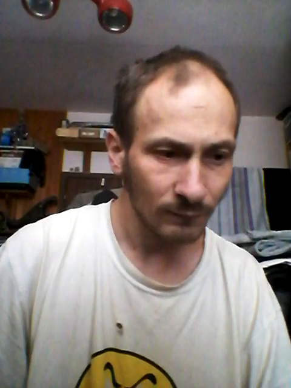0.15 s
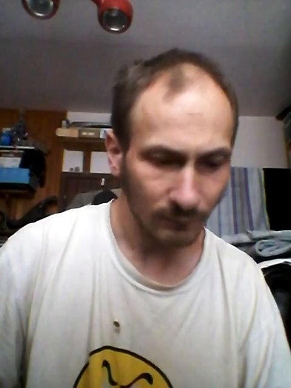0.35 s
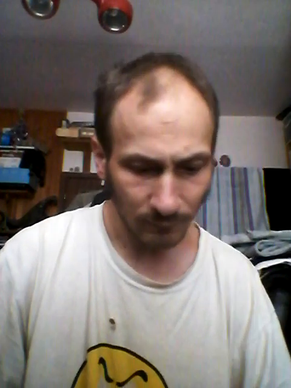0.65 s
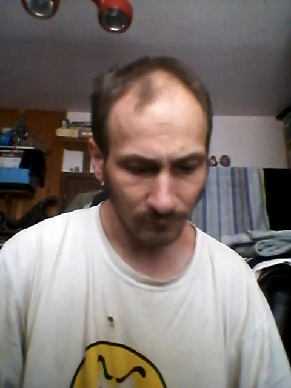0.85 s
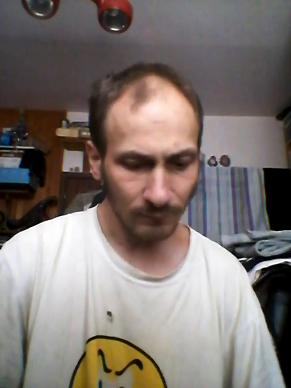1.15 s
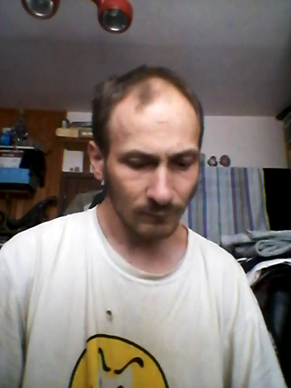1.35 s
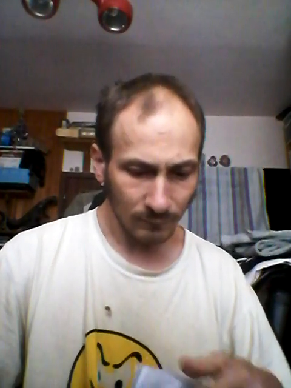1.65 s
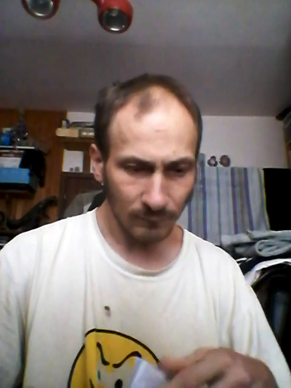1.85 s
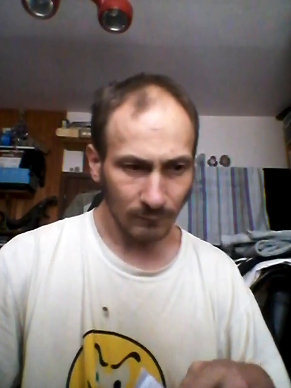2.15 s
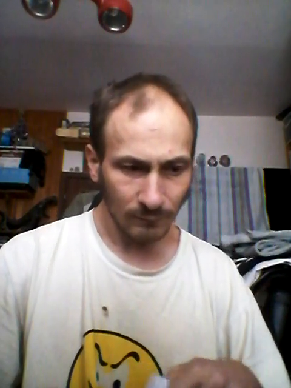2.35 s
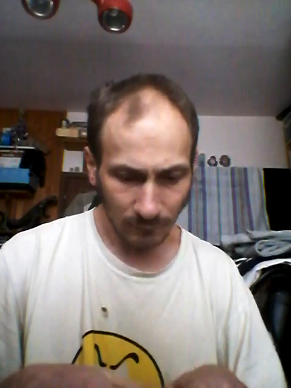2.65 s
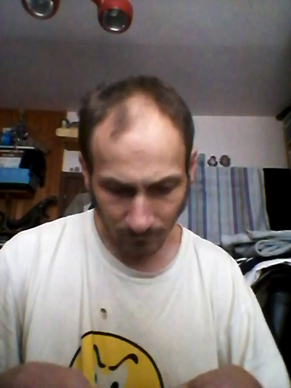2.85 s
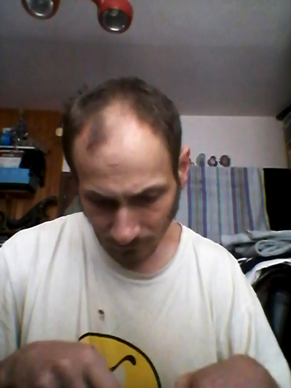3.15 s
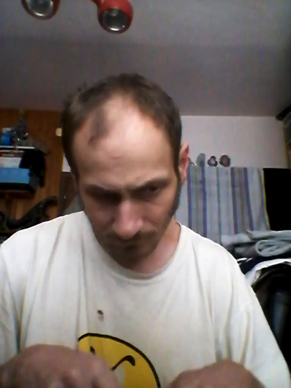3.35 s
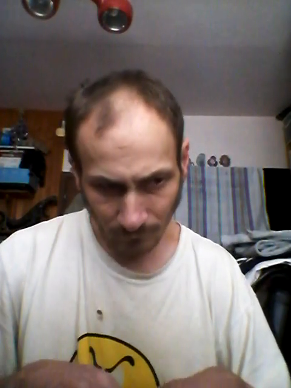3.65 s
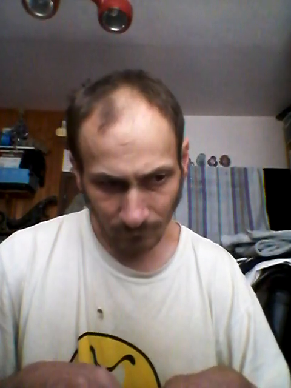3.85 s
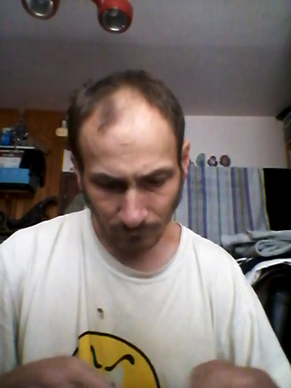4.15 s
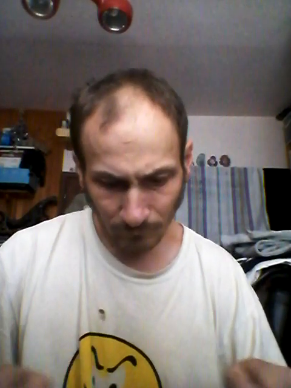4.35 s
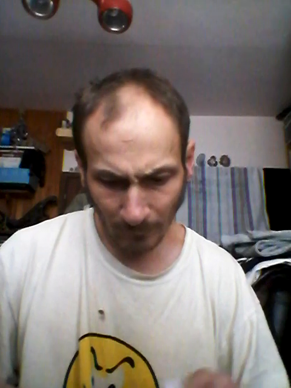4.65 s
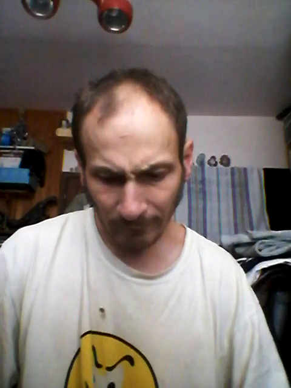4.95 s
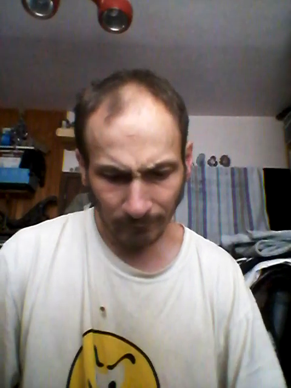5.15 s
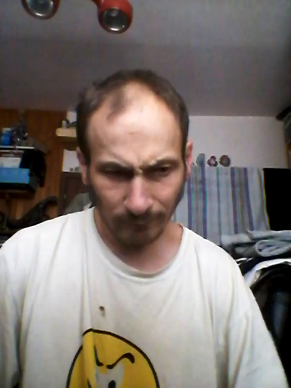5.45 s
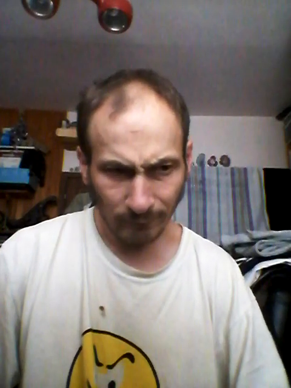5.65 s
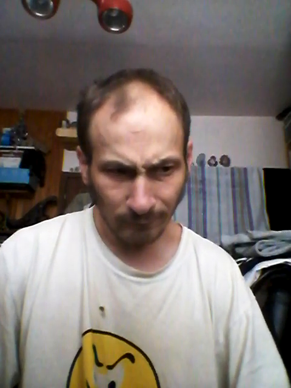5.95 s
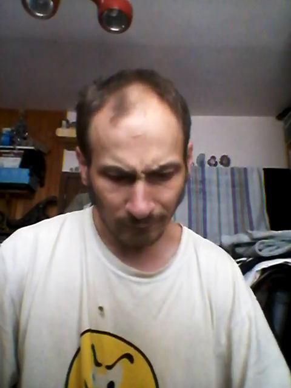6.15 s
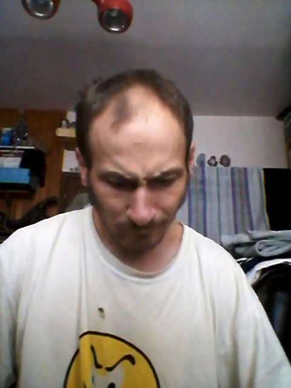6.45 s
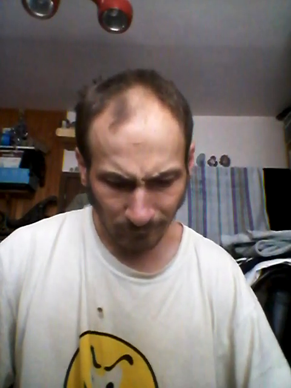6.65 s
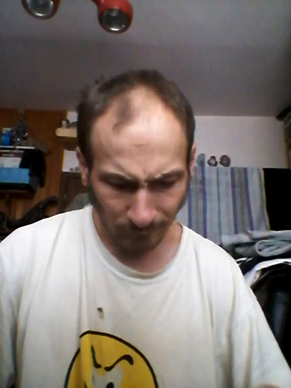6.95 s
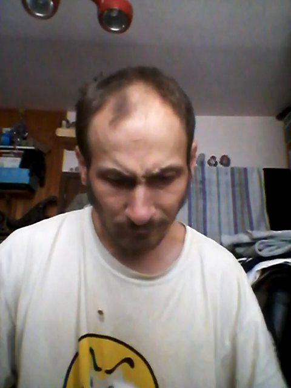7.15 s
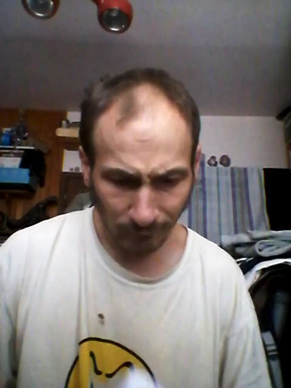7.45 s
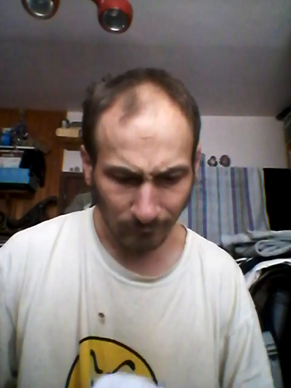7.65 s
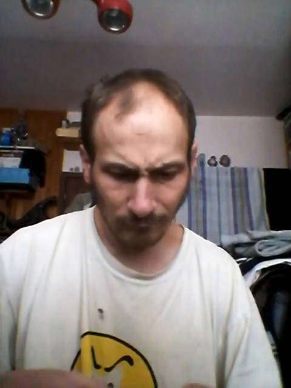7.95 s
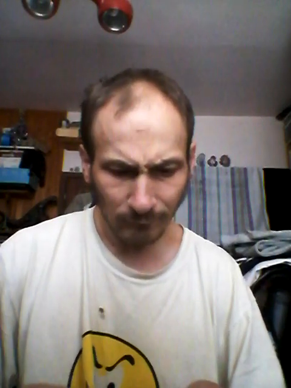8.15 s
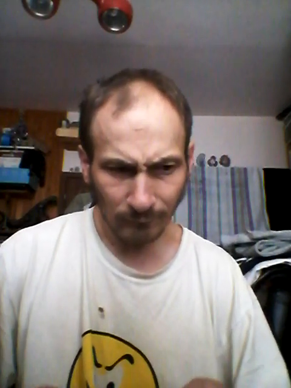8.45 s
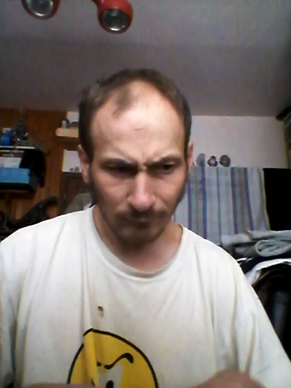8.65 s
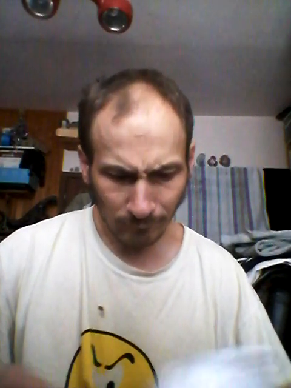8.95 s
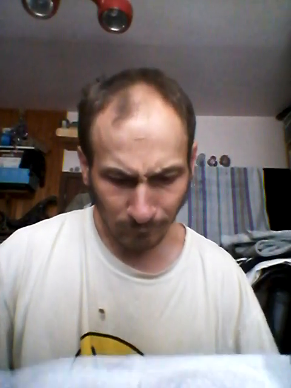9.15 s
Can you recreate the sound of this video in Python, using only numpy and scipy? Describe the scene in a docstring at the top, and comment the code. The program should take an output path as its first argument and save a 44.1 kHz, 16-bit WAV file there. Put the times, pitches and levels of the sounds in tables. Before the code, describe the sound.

Close mono sound in a small room with faint wavering rumble and soft hiss. At 0.1 s a dull, loud crease snap, with smaller pops and rustle until 0.45. Then almost quiet, with faint thin crinkles from 1.2 to 2.2. From 2.3 rustling grows, with a cluster of snaps at 2.75-2.95, the sharpest near 2.87, then scattered ticks and brighter crinkles. At 4.1 the wrapping tightens and rips loudly until about 4.45: dense, ragged, mid-heavy tearing with hard cracks and low air puffs. Soft rubbing and small clicks follow to 6.1. A second, crisper rip runs 6.15-6.35, opening with a high snap. Quiet handling continues, with modest snaps at 7.6 and light crinkles after 8.1. A bright crack at 8.75 leads to the final violent tearing from 8.88 to about 9.2, in several quick jerks, with clipped peaks and a brief room tail.

```python
"""Parcel torn open by hand

A paper and plastic parcel is opened in a small room, close to a mono desk microphone. Filtered crackle
makes the rustle and three bouts of ripping; decaying noise and a ringing facet make each snap.
Panels hum as band-passed noise, and jerks push low puffs of air. Loud peaks clip at the microphone.
A bounce and a short noise tail form the room, over wavering rumble and faint hiss."""
import sys
import numpy as np
from scipy import signal
from scipy.fft import rfft, irfft, next_fast_len
from scipy.io import wavfile
from scipy.ndimage import map_coordinates

SR = 44100
rng = np.random.default_rng(int(sys.argv[2]) if len(sys.argv) > 2 else 0)


def store_wav(level_fs):
    """Save 16-bit WAV to argv[1]."""
    pcm = np.round(np.clip(np.atleast_2d(level_fs), -1, 1) * 32767)
    wavfile.write(sys.argv[1], SR, pcm.T.astype(np.int16))


N = 409248
TOP_HZ = 14800  # band limit


def amp(db):
    """Decibels to gain."""
    return 10 ** (np.asarray(db) / 20)


def unit(x):
    """Scale to rms 1."""
    return x / np.sqrt(np.mean(x ** 2) + 1e-20)


def along(points, hz):
    """Interpolate (Hz, value) points on a log frequency axis."""
    point_hz, value = np.transpose(points)
    return np.interp(np.log(hz + 1), np.log(point_hz), value)


def wobble(knots_per_s):
    """Smooth random curve through normally distributed knots."""
    knots = rng.standard_normal(int(N * knots_per_s / SR) + 4)
    return map_coordinates(knots, [np.arange(N) * knots_per_s / SR])


def filtered(x, response):
    """Multiply the spectrum of x by a response of frequency."""
    size = next_fast_len(N + SR // 2)
    hz = np.fft.rfftfreq(size, 1 / SR)
    return irfft(rfft(x, size) * response(hz), size)[:N]


# background spectrum, relative: freq_hz, density_db_per_hz
HISS_COLOUR = [(25, 11.5), (60, 13), (130, 12.5), (250, 12), (450, 1.5), (1000, -1), (2500, -3.5),
               (4500, -11.5), (6300, -10.5), (9000, -4.5), (14500, -2)]


def hiss():
    """Faint room rumble that wavers, and steady microphone hiss."""
    white = rng.standard_normal(N)
    noise = unit(filtered(white, lambda hz: amp(along(HISS_COLOUR, hz)) * (hz < TOP_HZ)))
    rumble = filtered(noise, lambda hz: 1 / (1 + (hz / 300) ** 4))
    waver = amp(2.3 * wobble(knots_per_s=5.1)) - 1
    return amp(-64) * (noise + rumble * waver)


# colour of the wrapping at the microphone: freq_hz, density_db_per_hz
PAPER_COLOUR = [(60, -45), (140, -26.5), (250, -8), (600, -6.5), (1300, -1), (1800, -9), (3400, -8.5),
                (5400, -10), (6500, -20), (10000, -25.5), (12500, -36), (15000, -49)]
# resonances of parcel, desk and microphone port: freq_hz, width_hz, gain_db
RESONANCES = [(436, 150, 8.5), (713, 73, -5), (896, 380, 6.5), (2390, 980, 5), (4960, 1300, 6)]
# body, middle and crisp ranges: low_hz, high_hz
RANGES = [(40, 1600), (1600, 4000), (4000, 16000)]


def paper_clicks(low_db, air_db, size=4096):
    """Causal click of the wrapping in each range: minimum-phase response of its colour."""
    hz = np.fft.rfftfreq(size, 1 / SR) + 1
    bumps_db = sum(db / (1 + (2 * (hz - f) / width) ** 2) for f, width, db in RESONANCES)
    low_shelf_db = low_db / (1 + (hz / 650) ** 6)
    air_shelf_db = air_db / (1 + (11000 / hz) ** 8)
    colour = amp(along(PAPER_COLOUR, hz) + bumps_db + low_shelf_db + air_shelf_db)
    clicks = []
    for low_hz, high_hz in RANGES:
        gain = colour / np.sqrt((1 + (low_hz / hz) ** 10) * (1 + (hz / high_hz) ** 10))
        # folding the cepstrum onto positive time gives minimum phase
        cepstrum = irfft(np.log(gain + 1e-6))
        cepstrum[1:size // 2] *= 2
        cepstrum[size // 2 + 1:] = 0
        clicks.append(irfft(np.exp(rfft(cepstrum)))[:size // 2])
    return clicks


def crackle(clicks, buckles_per_s, size_db, colour_db, clump_db, rubs):
    """Tiny buckles at random moments, in clumps, over the rub of sliding paper; rms 1 per range."""
    count = int(buckles_per_s * N / SR)
    when = rng.integers(0, N, count)
    buckle_db = size_db * np.clip(rng.standard_normal(count), -2, 2)
    common_clumps = np.clip(wobble(knots_per_s=130), -2, 2)
    layers = []
    for click, rub in zip(clicks, rubs):
        # every buckle and clump has its own mix of body and crispness
        mix_db = colour_db * rng.uniform(-1, 1, count)
        push = amp(buckle_db + mix_db) * rng.choice([-1, 1], count)
        drive = unit(np.bincount(when, push, N)) + rub * rng.standard_normal(N)
        own_clumps = np.clip(wobble(knots_per_s=250), -2, 2)
        swell = amp(clump_db * (common_clumps + own_clumps))
        layers.append(unit(signal.fftconvolve(drive * swell, click)[:N]))
    return np.array(layers)


def pops(pops_per_s, pitch_hz, spread, cycles_per_30db, size_db=4, size=1000):
    """Small facets of the sheet flip over, each ringing briefly at its own pitch; rms 1."""
    count = int(pops_per_s * N / SR)
    when = rng.integers(0, N, (count, 1))
    draw = np.clip(rng.standard_normal((count, 2)), -2, 2)
    facet_hz = pitch_hz * np.exp(spread * draw[:, :1])
    turns = facet_hz * np.arange(size) / SR
    decay = amp(size_db * draw[:, 1:] - 30 * turns / cycles_per_30db)
    rings = decay * (1 - np.exp(-turns)) * np.sin(2 * np.pi * turns)
    samples = (when + np.arange(size)).ravel()
    return unit(np.bincount(samples, rings.ravel(), N)[:N])


def shared(level_db, bright_db, middle_db):
    """Gains of body, middle and crisp range: slack paper sounds dull, taut paper bright."""
    share = amp([-bright_db / 2, middle_db, bright_db / 2])
    return amp(level_db) * share / np.linalg.norm(share)


def played(rows, layers, attack_s, hold_rise_db, release_db_per_s):
    """Each move of the hands takes hold, holds and lets go; overlapping moves add in power."""
    power = np.zeros((len(layers), N + 2 * SR))
    t = np.arange(SR) / SR
    for start_s, hold_s, level_db, bright_db, middle_db in rows:
        hold_db = hold_rise_db * (np.minimum(t / hold_s, 1) - .5)
        release_db = -release_db_per_s * np.maximum(t - hold_s, 0)
        grip = np.minimum(t / attack_s, 1) * amp(hold_db + release_db)
        gains = shared(level_db, bright_db, middle_db)
        power[:, round(start_s * SR):][:, :SR] += np.outer(gains, grip) ** 2
    return np.sum(np.sqrt(power[:, :N]) * layers, axis=0)


# strokes of the fingers that turn, grip and crumple the wrapping, levels relative:
# start_s, hold_s, level_db, bright_db (crisp over body)
STROKES = [(0.116, 0.11, -38, -15), (0.278, 0.041, -42.5, -0.5), (0.405, 0.027, -47.5, -2.5),
           (0.619, 0.15, -58.5, 0), (0.685, 0.027, -50.5, 0.5), (1.163, 0.28, -55.5, 3.5),
           (1.246, 0.024, -49, 1), (1.365, 0.06, -50, 5), (1.507, 0.063, -62, 0), (1.78, 0.05, -52.5, 0.5),
           (1.897, 0.079, -51.5, 4.5), (2.036, 0.11, -49.5, 0), (2.217, 0.31, -48, 3),
           (2.311, 0.16, -40.5, 5), (2.634, 0.08, -50, 4.5), (2.76, 0.15, -37, 6), (2.959, 0.045, -56.5, 5),
           (3.126, .6, -49.5, 6), (3.179, 0.12, -43.5, 1.5), (3.553, 0.03, -41, 10),
           (3.794, 0.028, -47.5, 1), (3.9, 0.17, -53.5, 6.5), (4.083, 0.089, -31, 9.5),
           (4.552, 0.092, -38.5, 9.5), (4.682, 0.057, -48.5, -2.5), (4.788, .22, -42.5, 3),
           (5.02, 0.074, -50.5, -1.5), (5.223, 0.054, -48.5, -1), (5.32, 0.12, -49, -3),
           (5.518, 0.056, -45.5, -4.5), (5.646, 0.047, -46.5, 0.5), (5.797, 0.13, -52.5, 2.5),
           (5.914, 0.14, -49, 4), (6.069, 0.17, -43, 8.5), (6.432, 0.65, -51.5, 5.5),
           (6.55, 0.073, -42, 7.5), (6.913, 0.022, -36.5, 7.5), (7.0, 0.067, -56, 13),
           (7.2, 0.089, -60, -6), (7.419, 0.037, -50, -7), (7.52, .12, -43, 2), (7.65, .06, -48, 0),
           (8.104, 0.31, -48.5, 0.5), (8.369, 0.033, -36.5, -5), (8.43, 0.11, -54, 0),
           (8.565, 0.19, -46, 1.5), (8.69, 0.13, -40.5, 4), (8.845, .035, -32, 6.5)]
# faint rustle while the parcel is only held, relative: time_s, level_db
HELD = [(0, -70), (1.05, -79.5), (1.7, -79.5), (2.2, -62), (3.08, -63), (3.4, -52), (4.6, -53), (5.18, -66),
        (5.4, -59.5), (6.8, -53), (7.33, -63.5), (8.0, -57.5), (9.28, -44.5)]


def handling():
    """Soft rustle: the fingers buckle and rub the wrapping, with small pops in its body."""
    clicks = paper_clicks(low_db=4.5, air_db=11.0)
    body, middle, crisp = crackle(clicks, buckles_per_s=1100, size_db=2.5, colour_db=4, clump_db=1.0,
                                  rubs=[.35, .45, .8])
    body = unit(body + .55 * pops(pops_per_s=62, pitch_hz=1060, spread=.26, cycles_per_30db=4.0))
    layers = np.array([body, middle, crisp])
    middle_db = -1
    rows = [(*row, middle_db) for row in STROKES]
    strokes = played(rows, layers, attack_s=0.013, hold_rise_db=0, release_db_per_s=260)
    held_db = np.interp(np.arange(N) / SR, *np.transpose(HELD))
    held = amp(held_db) * (shared(level_db=0.5, bright_db=3, middle_db=-3.0) @ layers)
    # the pressure of the fingers is never even
    pressure_db = 2.8 * wobble(knots_per_s=48)
    return amp(-2.6 + pressure_db) * (strokes + held)


# the room's ring: freq_hz, t60_s
ROOM_RING = [(200, 0.27), (600, 0.13), (4000, 0.16), (10000, 0.22)]


def room(x, build_s=0.0036, bounce_s=0.012, bounce_gain=0.43, count=5):
    """The room's answer: one early bounce and a short tail that differs for each spot on the sheet."""
    hz, t, z = signal.stft(rng.standard_normal((count, SR // 3)), SR, nperseg=256)
    decay = amp(-60 * t / along(ROOM_RING, hz)[:, None])
    tails = signal.istft(z * decay, SR, nperseg=256)[1]
    tail_t = np.arange(tails.shape[1]) / SR
    tails *= 1 - np.exp(-(tail_t / build_s) ** 2)
    tails /= np.linalg.norm(tails, axis=1, keepdims=True)
    # the crackling spot wanders over the sheet
    spots = np.array([wobble(knots_per_s=25) for _ in range(count)])
    spots /= np.linalg.norm(spots, axis=0)
    bounce = np.pad(x, (round(bounce_s * SR), 0))[:N]
    ring = signal.fftconvolve(x * spots, tails, axes=1).sum(axis=0)[:N]
    return bounce_gain * bounce + ring


# creases that snap through and seams that give way, levels relative:
# start_s, ring_hz, level_db, bright_db (crisp over body)
SNAPS = [(0.1159, 1040, -10.5, -13), (0.1253, 1370, -28, 2.5), (0.1461, 810, -24, -9),
         (0.1846, 1030, -20, -2), (0.3034, 1200, -30.5, -8), (0.3236, 1050, -19.5, -6.5),
         (0.4054, 960, -37.5, 2), (0.4165, 880, -33, 8.5), (1.1693, 1070, -49.5, 6), (1.7893, 1100, -51, 1),
         (2.0532, 1130, -36.5, -5), (2.0774, 1170, -25, -3.5), (1.9714, 890, -45.5, 5),
         (2.2482, 930, -39, 5), (2.3149, 820, -36, -8.5), (2.3459, 800, -28.5, -23),
         (2.3603, 1240, -32, -5), (2.4072, 1190, -27, -11), (2.6456, 880, -43.5, -3),
         (2.7559, 920, -35, -20), (2.7656, 1320, -28.5, 4), (2.7805, 1190, -31, 9),
         (2.7847, 1120, -21.5, 3.5), (2.8106, 1060, -19.5, -20), (2.8649, 1140, -13.5, -1.5),
         (2.9085, 750, -29.5, -10.5), (2.9275, 1600, -22, -15.5), (3.1774, 930, -24.5, -16),
         (3.1958, 720, -23.5, 2), (3.3067, 1120, -31.5, -23), (3.4888, 1010, -30.5, -3),
         (3.5534, 1070, -30, -6.5), (3.5579, 975, -23.5, 4.5), (3.6917, 930, -26, 13.5),
         (3.811, 915, -33.5, -3.5), (3.9838, 1030, -21, -4.5), (4.0521, 790, -33, -14),
         (4.1377, 760, -22, -13), (4.168, 1110, -16.5, -6.5), (4.2121, 880, -12, -4),
         (4.2215, 890, -12, -9), (4.2351, 855, -12, -15), (4.2412, 880, -10, -18),
         (4.2503, 1080, -12.5, -18), (4.2649, 890, -6, -16), (4.2957, 1050, -5, -8.5),
         (4.338, 1090, -15, -16), (4.3547, 990, -14.5, -9.5), (4.3827, 900, -6.5, -4),
         (4.4053, 1330, -10, -3.5), (4.4463, 1190, -17.5, -6), (4.5371, 500, -34, 12),
         (4.565, 1340, -38, -8), (4.6424, 850, -29, -1), (4.804, 1010, -33.5, -15),
         (4.9022, 770, -32.5, -6), (4.9902, 1070, -29.5, 1.5), (5.223, 1206, -43.5, -9.5),
         (5.2547, 1350, -39.5, -1), (5.3971, 900, -44, -7), (5.4376, 1070, -39, 29),
         (5.9345, 1270, -39, -6), (5.998, 920, -38, -19), (6.049, 1410, -32, -19.5),
         (6.0827, 1330, -38.5, 19), (6.1496, 2700, -9.5, 10), (6.269, 1030, -17, 2), (6.3228, 640, -13, 12),
         (6.3374, 1110, -8, -4), (6.3427, 1300, -11, -0.5), (6.5551, 1010, -24, -14.5),
         (6.6201, 1180, -30, -5), (6.9669, 1150, -35, 5), (7.5939, 940, -24, -13),
         (7.6067, 1050, -20.5, -6.5), (8.0696, 1060, -38.5, -12), (8.1549, 1260, -30, 3.5),
         (8.3759, 1390, -26, -8.5), (8.3955, 1060, -29.5, -0.5), (8.7227, 570, -32.5, 10),
         (8.7468, 950, -8, 17.5), (8.7559, 810, -25.5, 26), (8.8773, 1320, -16.5, 12),
         (8.8959, 790, -3.5, -10.5), (8.9158, 690, -9.5, -14), (8.9307, 880, -10.5, -2),
         (8.9412, 990, -7.5, -8), (8.9622, 1050, -12.5, 2), (9.0125, 1230, -9.5, 2.5),
         (9.0802, 990, -10.5, -5), (9.1007, 1050, -12, -1), (9.1667, 990, -10, -13.5)]


def snaps(t60_s=.0125, attack_s=0.00027, crack=3.9, ring_t60_s=0.022, ring=.9,
          middle_db=-0.94, middle_db_per_octave=4, size=900):
    """A crease flips with a crack and a short avalanche, and its facet rings for a few cycles."""
    out, t = np.zeros(N + SR), np.arange(size) / SR
    head = SR // 250  # levels are set over the first 4 ms
    clicks = paper_clicks(low_db=-2, air_db=-11)
    rise = 1 - np.exp(-t / attack_s)
    for start_s, ring_hz, level_db, bright_db in SNAPS:
        avalanche = rng.standard_normal(size) * amp(-60 * t / t60_s) * rise
        avalanche[0] += crack
        parts = np.array([signal.fftconvolve(avalanche, click) for click in clicks])
        facet = np.sin(2 * np.pi * ring_hz * t) * amp(-60 * t / ring_t60_s) * rise
        parts[0, :size] += ring * facet * np.std(parts[0, :head]) / np.std(facet[:head])
        # small, high-pitched facets also crack harder in the middle range
        hard_db = middle_db + middle_db_per_octave * np.log2(ring_hz / 1050)
        gains = shared(level_db, bright_db, hard_db) / np.std(parts[:, :head], axis=1)
        snap = gains @ parts
        out[round(start_s * SR):][:len(snap)] += snap
    return out[:N]


# panels of the wrapping that flex or are stroked and hum hollowly, levels relative:
# start_s, nominal_length_s (hum spans 1.5 times this), pitch_hz, level_db
FLEXES = [(0.191, 0.037, 430, -41), (0.208, 0.03, 288, -42), (0.277, 0.04, 1280, -40),
          (2.335, 0.03, 583, -38.5), (4.092, 0.011, 1080, -39), (4.586, 0.01, 825, -40),
          (4.637, 0.035, 312, -43), (4.664, 0.01, 1110, -38.5), (4.709, 0.022, 430, -45),
          (4.789, 0.035, 910, -40), (4.898, 0.018, 830, -40.5), (4.978, 0.025, 430, -43.5),
          (5.529, 0.035, 950, -44.5), (6.175, 0.08, 421, -36), (6.318, 0.029, 437, -26),
          (7.512, 0.099, 970, -43), (8.684, 0.045, 470, -38.5), (8.885, 0.085, 438, -15)]


def flexes(width=0.43):
    """Stick and slip, as noise, drives one broad resonance of a panel for the length of a stroke."""
    out = np.zeros(N + SR)
    edge = 1 + width / 2
    for start_s, nominal_length_s, pitch_hz, level_db in FLEXES:
        size = int(1.5 * nominal_length_s * SR)
        panel = signal.butter(2, [pitch_hz / edge, pitch_hz * edge], "bandpass", fs=SR, output="sos")
        # the first half lets the resonance settle
        hum = signal.sosfilt(panel, rng.standard_normal(2 * size))[size:]
        stroke = np.sin(np.pi * np.linspace(0, 1, size) ** 0.45) ** 2
        out[round(start_s * SR):][:size] += amp(level_db) * unit(hum * stroke)
    return out[:N]


# pulls that rip it open, each running until the tear catches, levels relative:
# start_s, hold_s, level_db, bright_db (crisp over body), middle_db
PULLS = [(4.158, .12, -14.5, -3.5, -6.5), (4.285, 0.13, -17.5, -3.5, -3.5), (4.41, .045, -28, 5, 0),
         (6.146, 0.13, -22, 4.5, 2), (6.254, 0.082, -12, -1, -0.5), (8.875, .09, -12.5, -5, 0),
         (8.96, 0.043, -17.5, 3.5, 1), (8.99, 0.045, -13.5, 2, -1), (9.04, 0.11, -15, -0.5, -1),
         (9.125, 0.051, -11.5, 0, 2)]


def ripping():
    """Fibres break in a dense, ragged run along the tear, jerking the sheet."""
    clicks = paper_clicks(low_db=-0.5, air_db=-6)
    body, middle, crisp = crackle(clicks, buckles_per_s=1300, size_db=3.0, colour_db=6.5, clump_db=2.0,
                                  rubs=[.2, .4, .7])
    body = unit(body + 0.63 * pops(pops_per_s=170, pitch_hz=1013, spread=.2, cycles_per_30db=6.1))
    layers = np.array([body, middle, crisp])
    pulls = played(PULLS, layers, attack_s=.016, hold_rise_db=1, release_db_per_s=486)
    return amp(-2.2) * pulls


# jerks of the parcel that push air, before the microphone's bass cut: start_s, peak_db
PUFFS = [(4.293, -38), (4.392, -43.5), (8.888, -37.5)]


def puffs(pitch_hz=55, attack_s=0.0036, decay_s=0.0091, size=4096):
    """The parcel jerks as a seam gives way and pushes one low puff of air at the microphone."""
    out, t = np.zeros(N + SR), np.arange(size) / SR
    push = np.sin(2 * np.pi * pitch_hz * t) * (1 - np.exp(-t / attack_s)) * np.exp(-t / decay_s)
    push /= np.abs(push).max()
    for start_s, peak_db in PUFFS:
        out[round(start_s * SR):][:size] += amp(peak_db) * push
    return out[:N]


def scene():
    """Parcel and room, heard at one point."""
    rustle = handling() + amp(-5.5) * flexes()
    rips = ripping()
    cracks = amp(-1.5) * snaps()
    walls = room(amp(-4.5) * rustle + amp(-2.5) * rips + amp(-8) * cracks)
    mono = rustle + rips + cracks + walls + puffs() + hiss()
    return np.array([mono, mono])


def record(dry):
    """The microphone clips the loudest peaks, thins the bass and keeps nothing above its band limit."""
    low_cut_hz = 90

    def response(hz):
        """First-order bass cut and a sharp top limit."""
        return hz / np.hypot(hz, low_cut_hz) * (hz < TOP_HZ)

    clipped = np.clip(dry, -1, 1)
    return np.array([filtered(channel, response) for channel in clipped])


dry = scene()
out = record(dry)
store_wav(out)
```